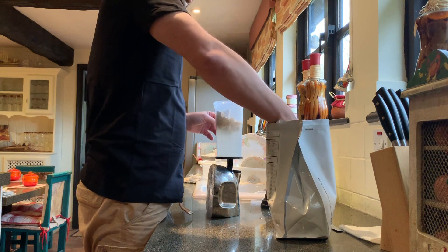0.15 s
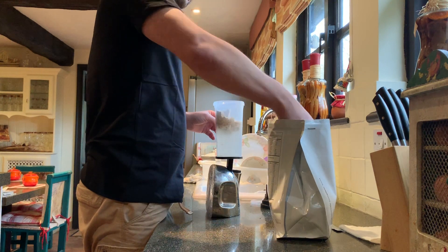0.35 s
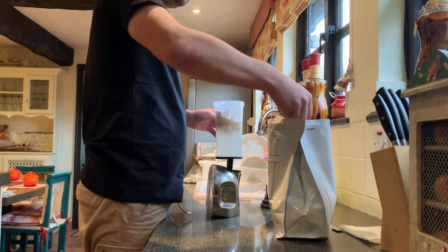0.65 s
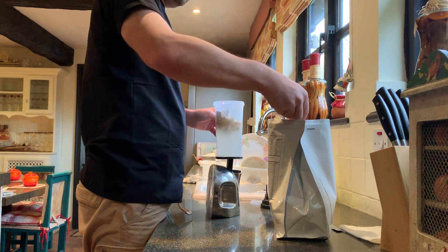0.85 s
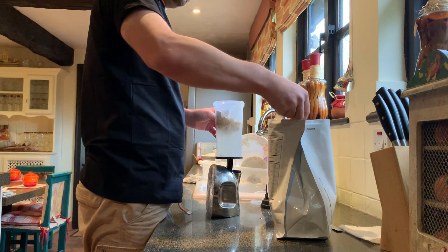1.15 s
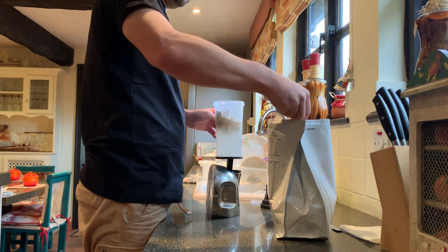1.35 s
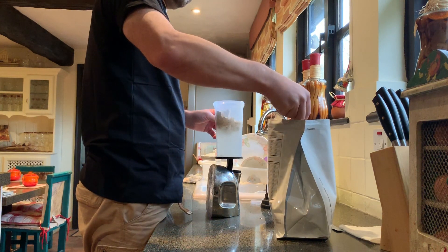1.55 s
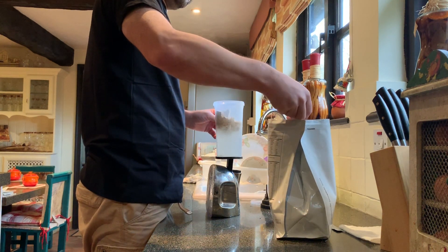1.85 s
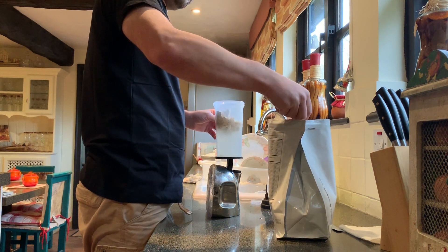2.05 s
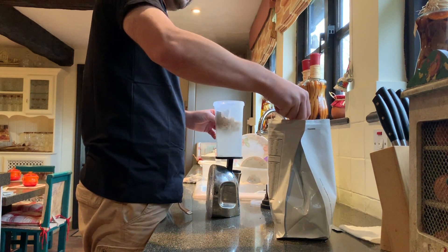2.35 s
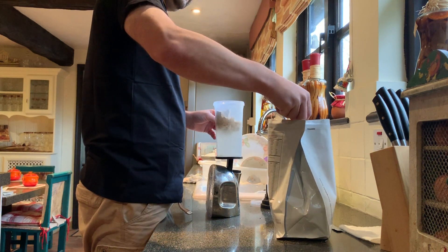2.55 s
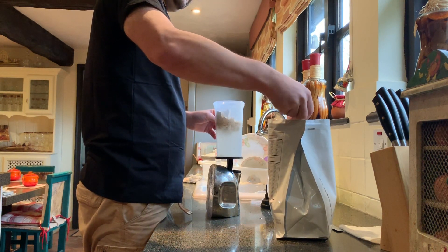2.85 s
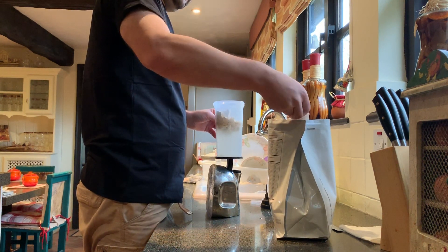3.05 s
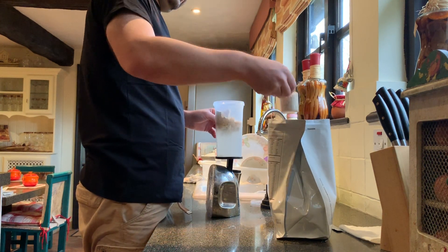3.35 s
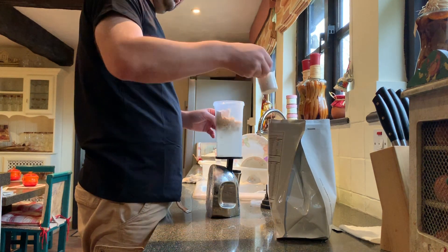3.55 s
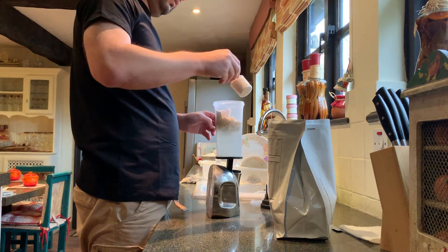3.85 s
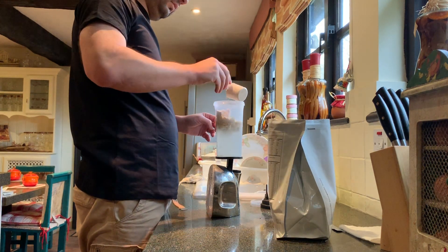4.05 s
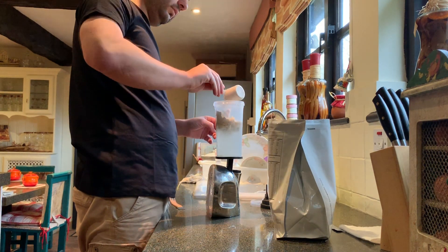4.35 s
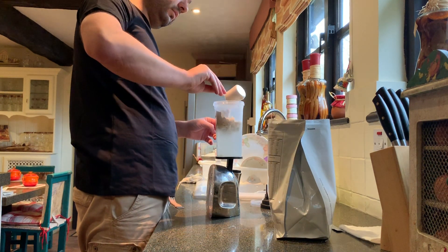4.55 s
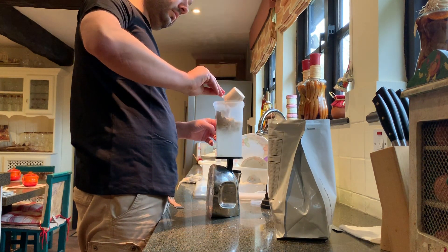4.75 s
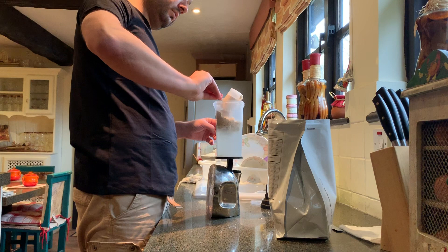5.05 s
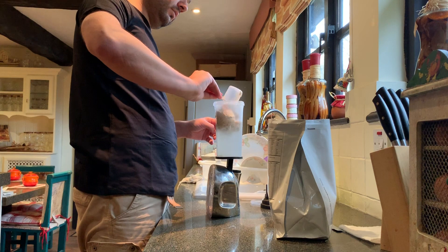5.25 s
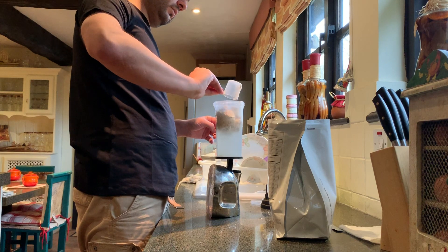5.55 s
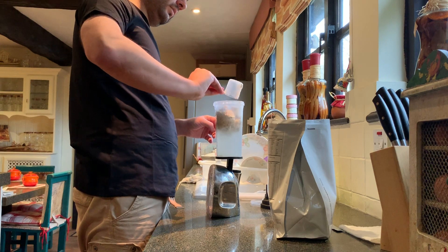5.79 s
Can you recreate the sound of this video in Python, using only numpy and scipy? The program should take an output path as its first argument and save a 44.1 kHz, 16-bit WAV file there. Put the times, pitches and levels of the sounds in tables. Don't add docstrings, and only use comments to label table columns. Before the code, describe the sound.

A plastic scoop crunches and knocks through powder in a stiff crinkly bag, then pours a very faint hiss into a cup in a quiet kitchen.

```python
import sys
import numpy as np
from scipy import signal
from scipy.fft import rfft, irfft
from scipy.io import wavfile
from scipy.ndimage import uniform_filter1d

SR = 44100
rng = np.random.default_rng(int(sys.argv[2]) if len(sys.argv) > 2 else 0)


def unload_wav(signal):
    wavfile.write(
        sys.argv[1],
        SR,
        np.round(np.clip(np.atleast_2d(signal).T, -1, 1) * 32767).astype(np.int16),
    )


def volts_from_db(level):
    exponent = np.asarray(level, float) / 20
    return 10 ** exponent


N = 261072
T = np.arange(N) / SR
F = np.fft.rfftfreq(N, 1 / SR) + 1e-3

# time in seconds, pressure in dB,
# dryness in dB (loose grains on the wall against packed powder).
SCOOP_DRAGS = [
    [(0.16, -73, -17), (0.326, -54, -3), (0.336, -33, -27), (0.37, -40.5, 5.5), (0.398, -37, -3.5),
     (0.434, -45, -6), (0.602, -42.5, -6), (0.648, -62, -9), (0.74, -80, 1)],
    [(0.77, -100, 8), (0.806, -63, -8), (0.85, -57.5, -8), (0.892, -48, -4.5), (0.91, -37, -10),
     (0.924, -61, -19), (0.998, -65, -8), (1.08, -108, 2)],
    [(2.06, -100, 2), (2.128, -55, -17), (2.172, -85, -24), (2.21, -72, -7), (2.394, -64.5, -11),
     (2.41, -45, -8), (2.438, -57.5, -22), (2.58, -71, -5), (2.98, -82.5, -5)],
    [(1.38, -82, -5), (1.46, -74.5, -1), (1.6, -74.5, -2), (1.78, -82, 1), (2.05, -79.5, -5)],
]
# start in seconds, level in dB, dryness in dB, decay t60 in seconds.
CREASES = [(0.17, -57.5, 5, 0.036), (0.218, -54, -7, 0.054), (0.28, -42, -3.5, 0.25),
           (0.343, -33.5, 3, 0.14), (0.807, -55.5, -5, 0.16), (0.902, -42, 3, 0.067),
           (1.115, -51, -10.5, 0.11), (1.225, -49, -4, 0.095), (1.315, -70, 14, 0.084),
           (1.347, -47, -2, 0.13), (1.518, -69, 6, 0.071), (1.588, -64, -10, 0.24),
           (1.654, -53.5, -7, 0.14), (1.803, -60, -1, 0.11), (1.839, -53, 1.5, 0.086),
           (1.951, -65.5, 14.5, 0.034), (2.061, -54, 9.5, 0.096), (2.071, -45.5, 4.5, 0.086),
           (2.088, -50.5, -4, 0.12), (2.181, -45.5, -6.5, 0.065), (2.223, -60, -7, 0.24),
           (2.278, -45, -6.5, 0.069), (2.336, -50, -4.5, 0.13), (2.402, -44.5, -15, 0.066),
           (2.44, -46, -6.5, 0.22), (2.586, -52, -3, 0.086), (2.637, -53, -10.5, 0.14),
           (2.956, -62, 0, 0.11), (3.024, -57.5, 6, 0.072), (3.034, -49.5, 0, 0.065)]
# start in seconds, level in dB, weight in dB, decay t60 in seconds.
POWDER_SLUMPS = [(0.032, -45.5, 19.5, 0.061), (0.12, -53, 24, 0.13), (1.235, -54, 17, 0.072),
                 (1.406, -56, 15.5, 0.06), (1.661, -56, 15.5, 0.071), (2.469, -52, 17, 0.074),
                 (2.529, -42, 9.5, 0.061), (2.662, -46.5, -2, 0.093), (3.036, -47.5, 0.5, 0.07),
                 (3.723, -52.5, -7, 0.022), (4.089, -54, 9.5, 0.14), (4.112, -56, 14, 0.1)]
# frequency in Hz, width in Hz, level in dB over the flat wall.
BAG_MODES = [(246, 57, -0.5), (385, 70, 0.5), (630, 21, 7), (858, 150, -2), (1096, 30, 7), (1317, 135, 3),
             (1330, 137, 0), (1823, 62, 8), (2170, 990, 1), (3000, 250, 0.5), (3300, 30, -13),
             (3570, 290, 2.5), (4220, 112, 1), (5330, 120, -2), (8750, 100, -39.5), (13300, 8100, 1)]
# start in seconds, level in dB, frequency in Hz, length in seconds.
PANEL_SONGS = [(.355, -42.5, 3624, 0.026), (.375, -38.5, 1313, 0.037), (0.456, -50, 1106, 0.031),
               (.56, -47.5, 1330, 0.036), (0.836, -53, 845, 0.039), (0.877, -62, 4220, 0.073),
               (1.232, -66.5, 3000, 0.028), (1.34, -58.5, 3090, 0.03), (1.652, -65, 3260, 0.012),
               (1.84, -63, 2850, 0.021), (2.342, -66, 3060, 0.029), (2.416, -63, 3300, 0.038),
               (2.465, -61, 3100, 0.034), (2.954, -73.5, 3300, 0.026), (3.019, -73, 4570, 0.014),
               (3.804, -83, 770, 0.21)]
# start in seconds, level in dB, ring in Hz, thump in dB, ring t60 in seconds.
SCOOP_KNOCKS = [(0.0325, -22, 676, -18, 0.013), (0.119, -42, 800, -22, 0.02), (0.334, -38.5, 630, -3, 0.14),
                (0.3985, -19.5, 1200, -30, 0.015), (0.505, -37.5, 258.4, -22, 0.16),
                (0.598, -37, 2170, -11.5, 0.11), (0.907, -66, 770, -15, 0.032),
                (0.917, -47, 556, -2, 0.024), (1.349, -43, 613, -10.5, 0.048), (1.62, -58, 150, -17, 0.11),
                (1.95, -56.5, 1340, -23, 0.033), (2.083, -44.5, 798, -2, 0.045),
                (2.407, -38, 1080, -18, 0.028), (2.412, -39.5, 586, -32, 0.05),
                (2.441, -32, 750, -6.5, 0.028), (2.706, -61.5, 503, 10.5, 0.03),
                (3.036, -51.5, 790, -21, 0.05), (3.721, -50, 617, -26, 0.017),
                (4.088, -53, 710, 4.5, 0.029), (4.112, -48, 738, 0, 0.081)]
# frequency in Hz, decay t60 in seconds, level in dB.
COUNTER_MODES = [(108.4, 0.34, 3), (168.3, 0.19, 3.5), (260, 0.07, -6), (366, 0.13, 2.5)]
# time in seconds, level in dB.
POUR_LEVEL = [(3.5, -100), (3.8, -77.5), (4.1, -76), (4.3, -73), (4.45, -72), (4.6, -83), (4.9, -100)]
# crest in seconds, level in dB.
HUM_SWELLS = [(0.05, -49), (0.16, -46.5), (0.35, -49.5), (0.48, -50.5), (0.66, -54), (0.83, -54),
              (0.95, -54), (1.17, -50.5), (1.28, -58), (1.42, -52), (1.52, -54.5), (1.62, -57),
              (1.72, -50.5), (1.88, -54), (2.11, -49), (2.31, -51.5), (2.47, -43.5), (2.69, -50),
              (2.82, -55), (3.05, -55), (3.3, -56), (3.46, -54.5), (3.89, -57), (4.17, -50), (4.37, -56),
              (4.78, -57.5), (5.26, -55.5), (5.49, -56), (5.6, -65), (5.74, -52)]
# frequency in Hz, density in dB per Hz, left-right likeness 0-1.
AIR_SPECTRUM = [(20.5, -6, 0.82), (75, -1.5, .95), (105.4, -7.5, 0.86), (188, -18, 0.71),
                (290, -17.5, 0.86), (344.5, -11.5, 0.91), (488, -23, 0.61), (650, -25, 0.5),
                (1466, -32.5, 0), (3000, -34.5, 0), (7560, -40, 0.1), (9000, -36.5, 0.4),
                (16500, -42, 0.32), (20000, -28, 0.26)]

BANDS_HZ, TILT_DB = (260, 1200, 3000, 5500, 10500), -5.5
DRAG_THUMP_DB, DRAG_THUMP_PER_DB, DRAG_PACKED_PER_DB = -52.5, 0.5, 0.51
DRAG_BITE_DB, DRAG_CRUNCH_DB, DRAG_CRUNCH_PER_DB = -4.5, -5.5, 0.2
CREASE_THUMP_DB, CREASE_THUMP_PER_DB, CREASE_BITE_DB, CREASE_BITE_PER_DB = 3.5, -0.8, -1.5, 0.41
RIM_BITE_DB, RIM_FROM_S = 4, 1.05
SLUMP_BITE_DB, SLUMP_SIZZLE_DB, SLUMP_DULL_PER_DB = -12, -13, 0.16
HUM_HZ, HUM_DB, SWELL_RISE_S, SWELL_FALL_S = 49.6, -61, 0.035, 0.035
WHINE_HZ, WHINE_DB = 1154, -92.5
AIR_DB = -60
ROOM_T60_S, ROOM_DB = 0.18, -6
TOP_HZ, SPLIT_HZ, IN_STEP_HZ, TURN_HZ = 15900, 6900, 7850, 3790


def unit(x):
    return x / np.sqrt(np.mean(np.abs(x) ** 2))


def walk(rate_hz):
    hold = int(SR / rate_hz)
    steps = np.repeat(rng.standard_normal(N // 50), hold)[:N]
    return unit(uniform_filter1d(uniform_filter1d(steps, hold), hold))


def decay(t, t60_s):
    return np.exp(-np.log(1000) * t / t60_s)


def add(track, start_s, sound):
    i = int(start_s * SR)
    track[..., i:i + sound.shape[-1]] += sound[..., :N - i]


def grains(scatter_db, patch_db):
    size_db = scatter_db * np.minimum(rng.exponential(size=N), 4.5)
    size = volts_from_db(size_db + patch_db * walk(260) + patch_db * walk(110))
    size = size / np.sqrt(uniform_filter1d(size ** 2, size=SR // 50))
    return unit(size * rng.standard_normal(N))


def add_drags(power):
    for drag in SCOOP_DRAGS:
        s, db, dry_db = np.transpose(drag)
        thump_db = DRAG_THUMP_DB + DRAG_THUMP_PER_DB * (db + 48) - DRAG_PACKED_PER_DB * (dry_db + 8)
        crunch_db = DRAG_CRUNCH_DB + DRAG_CRUNCH_PER_DB * dry_db
        bite_db = 0.5 * crunch_db + DRAG_BITE_DB
        levels_db = [thump_db, db - 4.0, db + bite_db, db + crunch_db, db + dry_db]
        for band, level_db in enumerate(levels_db):
            power[band] += volts_from_db(2 * np.interp(T, s, level_db - 3.5, -200, -200))


def add_collapse(power, s, db, thump_db, bite_db, sizzle_db, t60_s):
    t = T[:SR // 5]
    crunch_db = 0.5 * (bite_db + sizzle_db) - 3.0
    bands = [(thump_db, 1.3), (0, 1), (bite_db, 0.95), (crunch_db, 0.85), (sizzle_db, 0.7)]
    for band, (rel_db, last) in enumerate(bands):
        rise = (1 - np.exp(-t / (0.21 * t60_s * last ** 1.01))) ** 2
        fall = np.exp(-2 * np.log(1000) * (t / (t60_s * last)) ** 1.281)
        add(power[band], s - 0.005, volts_from_db(2 * (db + rel_db - 6.0)) * rise * fall)


def effort():
    power = np.zeros((len(BANDS_HZ), N))
    add_drags(power)
    for s, db, dry_db, t60_s in CREASES:
        thump_db = CREASE_THUMP_DB + CREASE_THUMP_PER_DB * dry_db
        bite_db = CREASE_BITE_DB + CREASE_BITE_PER_DB * dry_db + RIM_BITE_DB * (s > RIM_FROM_S)
        add_collapse(power, s, db, thump_db, bite_db, dry_db, t60_s)
    for s, db, weight_db, t60_s in POWDER_SLUMPS:
        dull_db = SLUMP_DULL_PER_DB * weight_db
        add_collapse(power, s, db, weight_db, SLUMP_BITE_DB - dull_db, SLUMP_SIZZLE_DB - dull_db, t60_s)
    return np.sqrt(power)


def bag():
    tilt = volts_from_db(TILT_DB * np.log2(np.maximum(F, 150))) * F ** 2 / (F ** 2 + 120 ** 2)
    grit = grains(scatter_db=2.0, patch_db=2.5)
    spectrum = 0
    for band, envelope in enumerate(effort()):
        share = np.interp(np.log(F), np.log(BANDS_HZ), np.eye(len(BANDS_HZ))[band])
        colour = unit(tilt * np.sin(share * np.pi / 2) ** 2)
        spectrum = spectrum + colour * rfft(envelope * volts_from_db(walk(70)) * grit)
    shake = irfft(spectrum, N)
    rings = np.zeros(N)
    for hz, width_hz, db in BAG_MODES:
        b, a = signal.iirpeak(hz, hz / width_hz, SR)
        rings += volts_from_db(db) * signal.lfilter(b, a, shake * volts_from_db(4 * walk(50)))
    return volts_from_db(-4.0) * (1.11 * shake + rings)


def panels():
    out = np.zeros(N)
    for s, db, hz, length_s in PANEL_SONGS:
        t = T[:int(length_s * SR)]
        detune, phase = rng.uniform(-1.008, 1, (2, 4, 1))
        cluster = np.sin(2 * np.pi * hz * (1 + 0.09 * detune) * t + np.pi * phase).sum(axis=0)
        add(out, s, volts_from_db(db) * cluster * np.sin(np.pi * (t / t[-1]) ** 0.86))
    return out


def ring(hz, t60_s):
    t = T[:SR // 2]
    return np.sin(2 * np.pi * hz * t) * decay(t, t60_s)


def knocks():
    out = np.zeros(N)
    for s, db, hz, thump_db, t60_s in SCOOP_KNOCKS:
        c = rng.standard_normal(8)
        tick = ring(hz, t60_s)
        tick += 0.4 * ring(hz * 1.4 * (1 + 0.088 * c[0]), 0.5 * t60_s)
        tick += 0.54 * ring(hz * 0.55 * (1 + 0.015 * c[1]), t60_s)
        thump = 0
        for k, (mode_hz, mode_t60_s, mode_db) in enumerate(COUNTER_MODES):
            thump = thump + volts_from_db(mode_db + 2 * c[2 + k]) * ring(mode_hz * (1 + 0.11 * c[k]), mode_t60_s)
        fade = np.sin(np.minimum(T[:len(tick)] * hz / 0.79, 1) * np.pi / 2) ** 2
        add(out, s, fade * (volts_from_db(db - 1.5) * tick + volts_from_db(db + thump_db - 4.5) * thump))
    return out


def pour():
    colour = np.exp(-(np.log(F / 11000) / 0.28) ** 2)
    colour += 0.5 * np.exp(-(np.log(F / 4500) / 0.3) ** 2)
    colour += 0.47 * np.exp(-(np.log(F / 8000) / 0.73) ** 2)
    hiss = unit(irfft(colour * rfft(grains(scatter_db=3.0, patch_db=-0.5)), N))
    return volts_from_db(np.interp(T, *np.transpose(POUR_LEVEL))) * hiss


def room(x):
    t = T[:int(0.6 * SR)]
    tail = rng.standard_normal((2, len(t))) * decay(t, ROOM_T60_S) * (t > 0.003)
    tail = signal.lfilter([0.55], [1, -0.45], tail)
    tail = signal.lfilter(*signal.butter(1, 450, "high", fs=SR), tail)
    tail *= volts_from_db(ROOM_DB) / np.sqrt(np.sum(tail ** 2, axis=1, keepdims=True))
    lag = np.exp(-2j * np.pi * F * 1.66 / SR)
    direct = np.array([irfft(rfft(x) * lag, N), x])
    return direct + signal.fftconvolve(x[None], tail, axes=1)[:, :N]


def fridge():
    hum = np.sin(2 * np.pi * np.cumsum(HUM_HZ * (1 + 0.0403 * walk(12.0))) / SR)
    whine = np.sqrt(2) * volts_from_db(WHINE_DB + 2 * walk(3.1)) * np.sin(2 * np.pi * WHINE_HZ * T)
    s, db = np.transpose(HUM_SWELLS)
    since = T[::256, None] - s
    slope_s = np.where(since < 0, SWELL_RISE_S, SWELL_FALL_S)
    crests = np.exp(-(since / slope_s) ** 2) @ volts_from_db(2 * db)
    power = volts_from_db(2 * HUM_DB) + np.interp(T, T[::256], crests)
    return np.sqrt(2 * power) * hum * volts_from_db([[-0.5], [0.5]]) + whine


def air():
    hz, db, like = np.transpose(AIR_SPECTRUM)
    like = np.clip(np.interp(np.log(F), np.log(hz), like), 0, 1)
    mid, side = rfft(rng.standard_normal((2, N)))
    pair = np.sqrt(1 + like) * mid + np.sqrt(1 - like) * side * np.array([[1], [-1]])
    pair = pair * volts_from_db(np.interp(np.log(F), np.log(hz), db))
    low = 1 / (1 + (F / 250) ** 2)
    top = 1 / (1 + (2500 / F) ** 2)
    floor = irfft(pair * low, N) * volts_from_db(0.49 * walk(6.49))
    floor += irfft(pair * (1 - low) * (1 - top), N) * volts_from_db(0.14 * walk(3.12))
    floor += irfft(pair * top, N)
    return unit(floor) * volts_from_db(AIR_DB)


def scene():
    return room(bag() + panels() + knocks() + pour()) + fridge() + air()


def band_limit(x):
    return signal.sosfilt(signal.butter(12, 15910, fs=SR, output="sos"), x)


def record(dry):
    left, right = rfft(dry) * np.clip((TOP_HZ - F) / 60, 0, 1)
    share = np.clip((F - SPLIT_HZ) / 1800 + 0.5, 0, 1) * np.pi / 2
    turn = 2 * np.pi * np.minimum((F - IN_STEP_HZ) / TURN_HZ, 2)
    early = left * np.exp(1j * (turn - 0.38 * np.sin(2 * turn)))
    share = share - 0.6 * np.sin(turn) ** 2 * np.sin(share)
    right = np.cos(share) * right + np.sin(share) * early
    lean_db = np.interp(np.log(F), np.log([60, 300, 2500, 5000]), [-0.87, 0.21, 1.0, -0.45])
    lean = volts_from_db(lean_db) ** (F < SPLIT_HZ)
    mix = irfft(np.array([left * lean, right / lean]), N)
    return band_limit(mix)


dry = scene()
out = record(dry)
unload_wav(out)
```